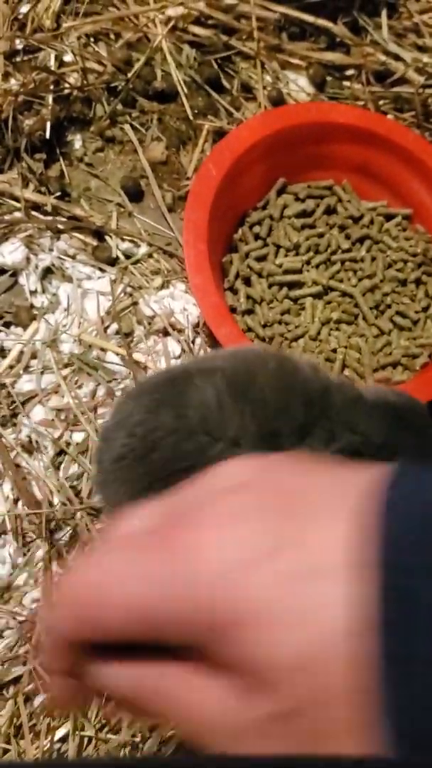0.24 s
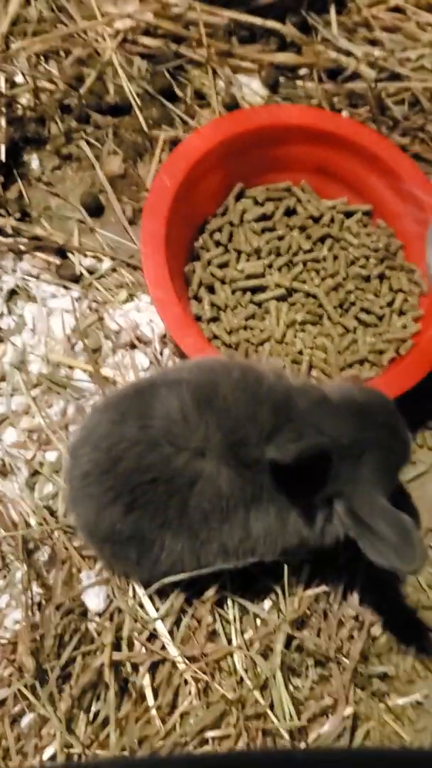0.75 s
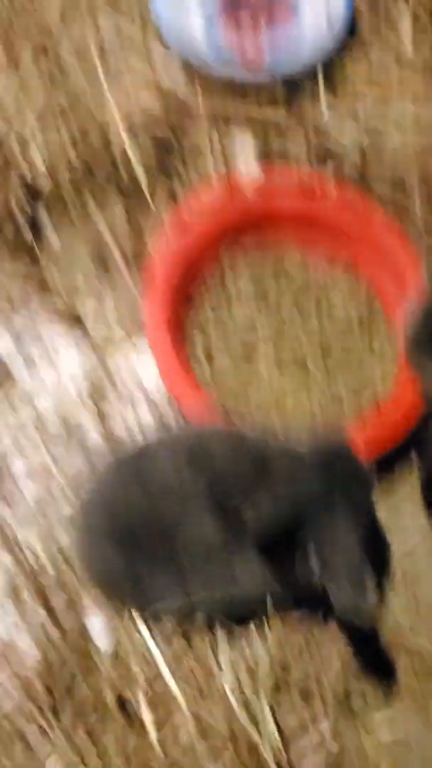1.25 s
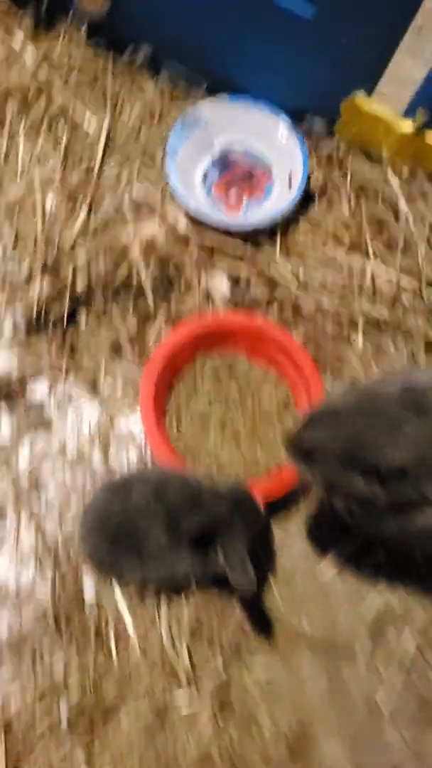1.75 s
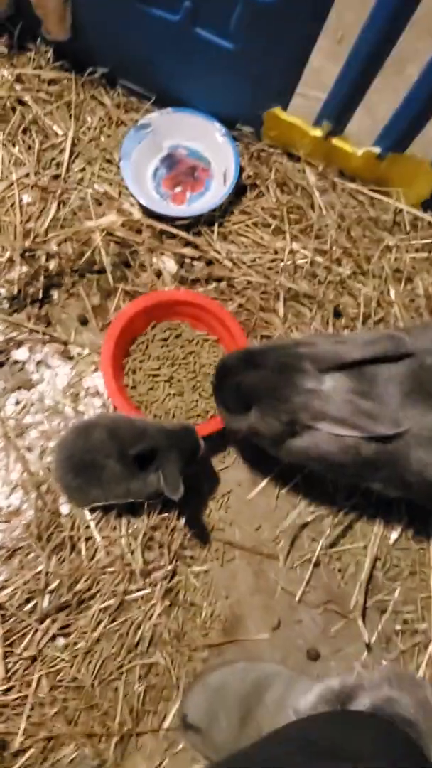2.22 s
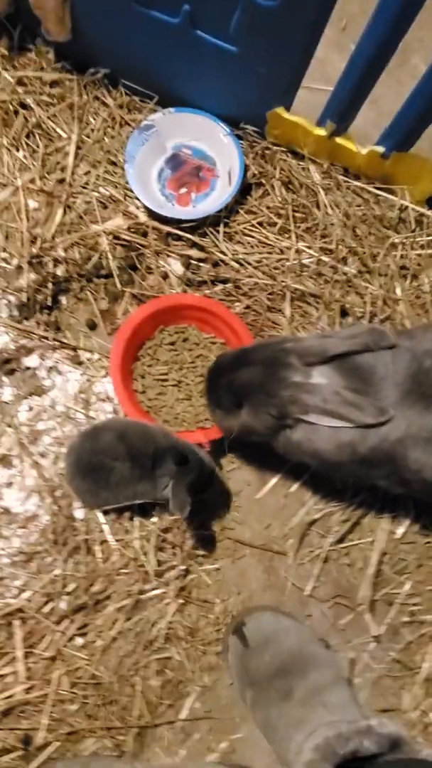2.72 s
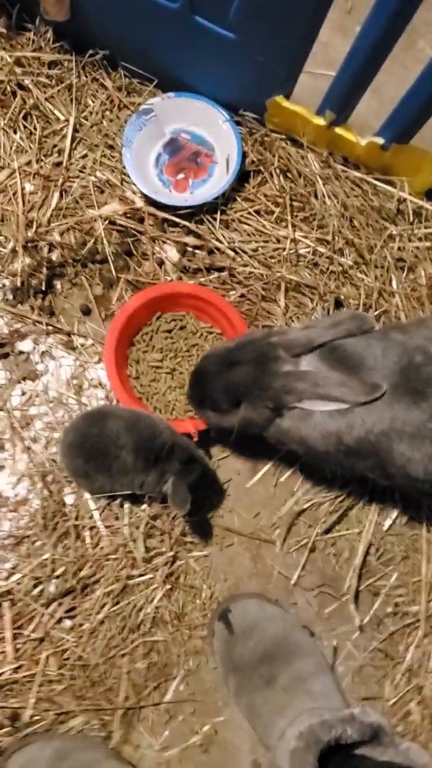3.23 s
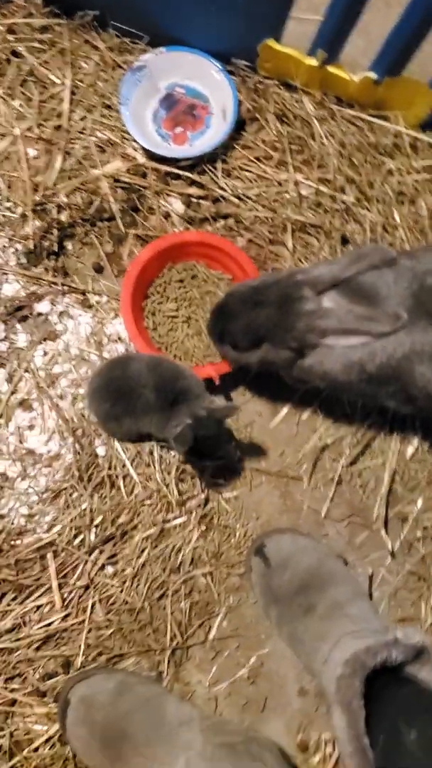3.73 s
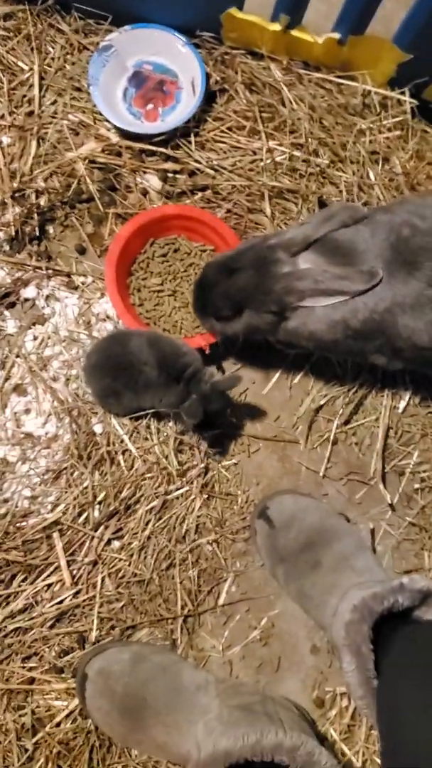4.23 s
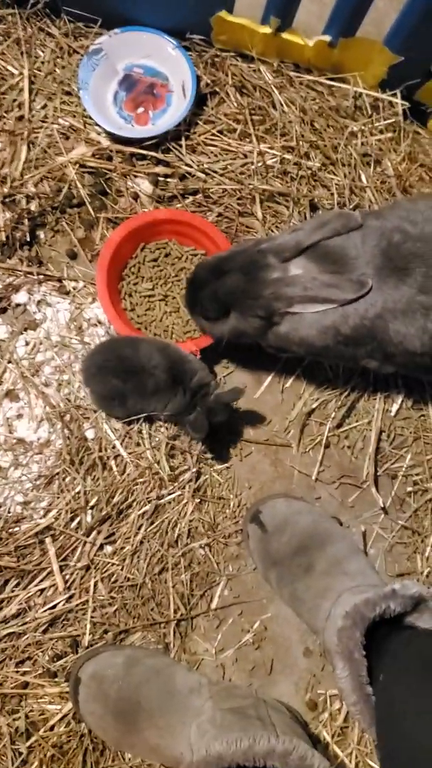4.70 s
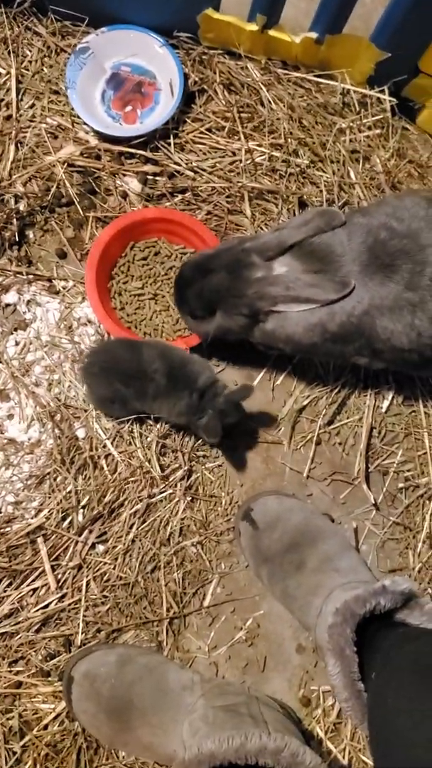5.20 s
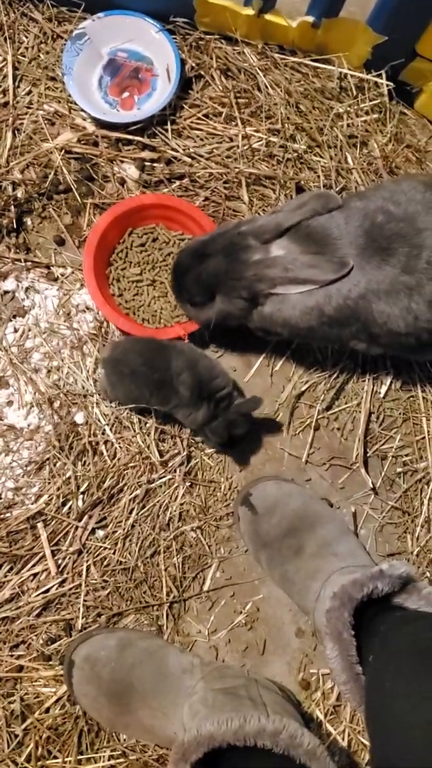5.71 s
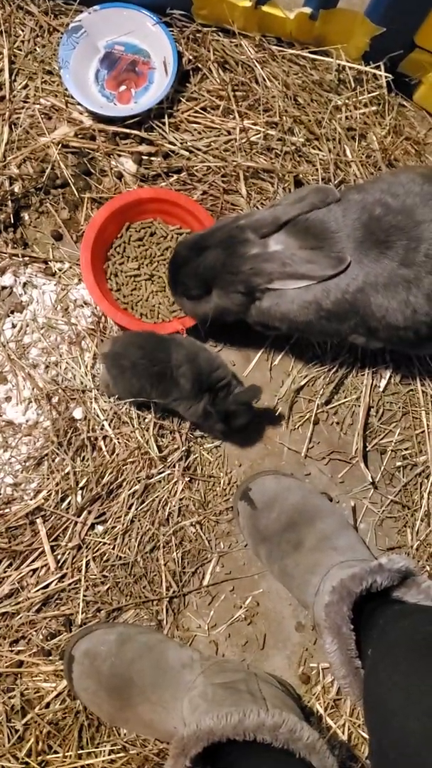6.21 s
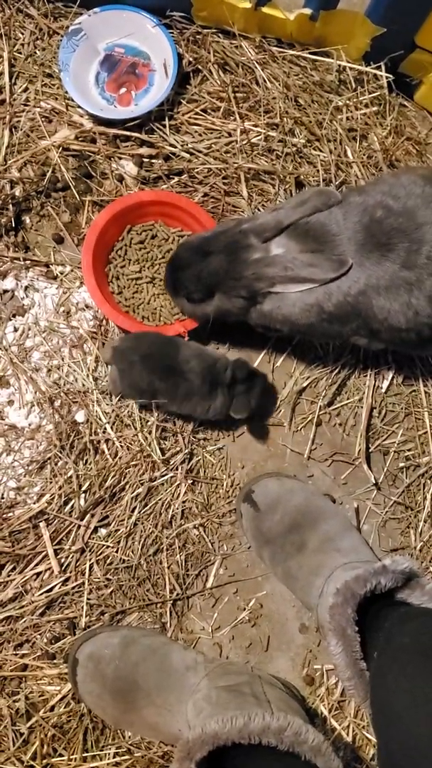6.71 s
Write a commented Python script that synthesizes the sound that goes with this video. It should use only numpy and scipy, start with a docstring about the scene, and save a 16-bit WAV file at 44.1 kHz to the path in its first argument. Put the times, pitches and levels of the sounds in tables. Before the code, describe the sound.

Straw rustles and crackles as rabbits shift about a pen, with tiny pellet ticks, soft thuds and one hollow plastic knock at the end.

```python
"""In a small shed, rabbits move about a straw-bedded plastic pen. Straw and cloth rustle in bursts,
stalks snap, pellets tick in the bowl, paws and slippers thud, and at the end a knock rings a panel.
Wire mesh sings faintly over still air, a rumble and a hum. Rustles are noise made of tiny slips; rings
are tones that die away. Short sounds echo in the shed. A hand-held phone hears it all through two
microphones, the left far brighter than the right."""
import sys
import numpy as np
from scipy import signal
from scipy.fft import rfft, irfft, next_fast_len
from scipy.io import wavfile
from scipy.ndimage import uniform_filter1d, map_coordinates

SR = 44100
rng = np.random.default_rng(int(sys.argv[2]) if len(sys.argv) > 2 else 0)


def wrap_up_sound(samples):
    """Save the sound to the file named by the first command line argument, as 16-bit audio."""
    columns = np.atleast_2d(samples).T
    # keep every value between -1 and 1, then stretch to whole-number steps
    tamed = np.clip(columns, -1, 1)
    steps = np.round(tamed * 32767).astype(np.int16)
    wavfile.write(sys.argv[1], SR, steps)


N = 306495

# A body moves in the straw: peak t/s, length/s, fine rustle/dB, coarse rustle/dB, scrape/dB, scuff/dB
MOVES = [(0.047, .08, -64, -96, -92, -65.5), (0.218, 0.31, -62, -76, -80, -61),
         (0.333, 0.23, -75, -67.5, -63.5, -69), (0.628, 0.47, -71, -65.5, -63, -54.5),
         (0.881, .09, -60, -61.5, -66, -66), (1.015, 0.12, -66.5, -76, -91, -78),
         (1.29, 0.32, -54.5, -68, -60, -59), (1.495, 0.11, -64, -83, -81, -63),
         (1.75, 0.59, -62.5, -70, -62, -59.5), (1.993, 0.21, -61.5, -74, -67, -69),
         (2.36, 0.38, -51, -62.5, -62, -84), (2.55, 0.33, -46.5, -60, -61, -68),
         (2.619, 0.081, -44, -52, -44.5, -48), (2.668, 0.16, -50, -59, -62, -64),
         (2.808, 0.026, -56, -68, -71, -80), (2.941, 0.15, -51.5, -66.5, -67.5, -66),
         (3.201, 0.11, -56.5, -65, -66.5, -86), (3.34, 0.23, -50.5, -61.5, -55.5, -59.5),
         (3.687, .3, -66, -81, -72.5, -64), (4.109, 0.14, -65, -88, -69.5, -61.5),
         (4.477, 0.15, -66, -74, -73, -59), (4.638, 0.28, -62.5, -64.5, -64.5, -72),
         (4.734, 0.07, -58, -62, -61, -70), (4.95, .07, -73, -70, -71, -79),
         (5.199, 0.11, -61.5, -69.5, -65.5, -75), (5.284, .1, -75, -65, -61, -73),
         (5.483, 0.21, -61.5, -69.5, -65.5, -60), (5.634, 0.19, -49.5, -72, -69, -82),
         (5.744, 0.25, -53.5, -58.5, -64, -82), (6.006, 0.1, -51, -62.5, -64, -58.5),
         (6.188, 0.016, -51, -66, -78, -80), (6.312, 0.042, -53.5, -69, -80, -80),
         (6.349, 0.031, -43, -63, -78, -78), (6.384, 0.079, -46, -62, -63.5, -81),
         (6.483, 0.042, -52, -73, -78, -64), (6.663, 0.087, -57.5, -58.5, -60, -84),
         (6.8, 0.1, -60, -60.5, -54, -66), (6.95, 0.051, -50, -80.5, -81, -70)]
# Fidgeting between the moves: t/s, straw level/dB, ground level/dB
FIDGETS = [(0, -73.5, -91), (.5, -79.5, -73), (1.1, -70.5, -71), (1.5, -62.5, -72), (2.1, -61.5, -61.5),
           (2.45, -59, -71), (2.8, -61.5, -66), (3.1, -65, -75), (3.6, -66, -75), (4.25, -72, -81),
           (4.6, -67.5, -68), (4.85, -79, -74), (5.35, -67, -63), (5.9, -70, -74), (6.15, -59.5, -64),
           (6.3, -70, -85), (6.6, -65, -71), (6.95, -70, -94)]
# Where the straw stirs: t/s, pan/dB (pan is how much louder the left is than the right)
STRAW_PAN = [(0, 14), (.6, 1), (.89, 4), (1.3, -12.5), (1.7, -2.3), (2.36, 0.5), (3.48, -2), (4.78, 5.5),
             (6.25, -4.5), (6.95, 7.5)]
# The colour (strength at each pitch) of fine and of coarse straw: f/Hz, level/dB
FINE_COLOUR = [(2940, -47.5), (5000, -15), (6860, -8.5), (7940, -15), (8880, -6), (9930, -10.5),
               (10800, -4.5), (12700, 0.5), (15000, -9), (15800, -10), (16100, -32.5)]
COARSE_COLOUR = [(900, -34), (1400, -5), (2000, -7.5), (3500, -3.5), (5500, -6), (8000, -24)]
def straw():
    """Fine and coarse rustle swell with every move and crackle on after every snap."""
    peak_s, length_s, fine_db, coarse_db = np.transpose(MOVES)[:4]
    snap_s, _, dull_db, _, crackle_db = np.transpose(SNAPS)
    rest_db = curves(FIDGETS)[0]
    settle_s = 0.14
    fine = swells(peak_s, length_s, fine_db) + tails(snap_s, crackle_db, settle_s) + amp(2 * rest_db)
    coarse = swells(peak_s, length_s, coarse_db) + tails(snap_s, crackle_db + dull_db, settle_s)
    coarse += amp(2 * (rest_db - 10))  # doubling the dB gives power; the square root gives gain again
    bright = np.sqrt(fine) * rustle(FINE_COLOUR, spiky_db=2.5, lumpy_db=0.9)
    dull = np.sqrt(coarse) * rustle(COARSE_COLOUR, spiky_db=2.5, lumpy_db=0.6)
    return bright * sides(curves(STRAW_PAN)[0]) + dull


# Breaking stalks: t/s, level/dB, dull part against bright part/dB, pan/dB, crackle afterwards/dB
SNAPS = [(0.2027, -40, -24, 14, -60), (.851, -33, -10, 1, -44.5), (.966, -47, -22, -6, -65),
         (1.2998, -27, -4.5, -22, -75), (1.575, -34.5, -17, -8, -63), (1.612, -43, -18, 1.5, -61),
         (1.699, -39, -23, 4.5, -64), (1.774, -35, -14, -3, -50), (1.8206, -37, -12, 0, -55),
         (1.942, -36.5, -8, -14, -64), (2.1795, -25.5, -5.5, -2.5, -49), (2.311, -36, -16, 13, -45.5),
         (2.3535, -33, -18, 11, -44), (2.3984, -29, -16, 1, -48), (2.4612, -28, -17, 0, -44.5),
         (2.634, -23, -20, 1, -41), (2.8098, -39, -13, 3.5, -65), (2.8637, -35.5, -8.5, 4, -60),
         (2.903, -31.5, -20, -1, -68), (2.936, -46, -14, 28, -53), (2.9931, -39, -11, 2, -67),
         (3.131, -41, -8, 2, -72), (4.249, -49, -31, 4, -77), (4.2877, -51, -30, 9.5, -66),
         (4.3196, -48, -28, 3.5, -72), (4.492, -46.5, 13, 25, -78), (4.6124, -29.5, -9, -1, -57),
         (4.905, -55, 4, 10.5, -86), (4.9455, -51.5, 2, 10.5, -72), (5.2014, -38, 4, 3, -67),
         (5.3133, -46.5, -13, 14, -81), (5.4294, -47, 0, 11, -68), (5.7046, -37, -24, 5, -58),
         (5.7751, -29, -8.5, -1, -64), (5.8217, -28.5, -8.5, 0, -52), (5.9156, -42, -27, .6, -52),
         (5.932, -36, -32, 2, -68), (5.986, -39, -28, 8, -48), (6.165, -61, -28, -1, -73),
         (6.19, -40, -16, 10, -69), (6.225, -52, -24, 5, -70), (6.2622, -42, -22, -1.5, -64),
         (6.303, -41, -18, 8.5, -58), (6.341, -36, -41, 6, -58), (6.48, -41, -31, -1.5, -64),
         (6.9353, -40, -32, -1, -56)]
def snaps():
    """A stalk breaks: a few milliseconds of splinters, bright with a dull part, then the echo."""
    out, t = np.zeros((2, N)), np.arange(600) / SR
    bright, dull = impulse(FINE_COLOUR), impulse(COARSE_COLOUR)
    for s, db, dull_db, pan_db, _ in SNAPS:
        splinters = fade(t, fade_s=0.0059) * rng.standard_normal(len(t))
        crack = np.convolve(splinters, bright + amp(dull_db) * dull)
        crack /= np.abs(crack).max()
        add(out, s, amp(db) * sides(pan_db)[:, None] * in_shed(crack, wet_db=-3), lag=-9)
    return out


# Knocks on the pen: t/s, level/dB
KNOCKS = [(6.772, -13), (6.785, -22)]
# The panel's own tones: f/Hz, level/dB, fade/s (a fade is the time taken to drop by 60 dB)
PANEL_TONES = [(193.5, -6, 0.22), (250, -13, 0.18), (336.3, 3, 0.25), (413.3, 3, 0.24), (470, -19, 0.21),
               (540, -12, 0.29), (554, -7.5, 0.31), (585, -3.5, 0.26), (710, -22, 0.24), (865, -9, 0.13),
               (1013, -14, 0.13), (1275, -27, 0.19), (1375, -24, 0.19), (1451, -9, 0.2), (1456, -28, .22),
               (1900, -34, 0.25), (2692, -29.5, 0.2)]
# The knock's dull noise: f/Hz, level/dB
KNOCK_COLOUR = [(35, -60), (60, -29), (202, -12.5), (266, -19), (342, -3), (554, -4.5), (1080, -28),
                (1390, -19), (1680, -32.5), (9000, -57), (11700, -95), (19800, -120)]
def panel():
    """A blunt knock and its rebound ring the hollow panel, nearer the left microphone."""
    out, t = np.zeros((2, N)), np.arange(SR // 4) / SR
    ring = ringing(t, PANEL_TONES) * onset(t, rise_s=0.001)
    for s, db in KNOCKS:
        add(out, s, amp(db - 6.5) * np.array([ring, ring]), lag=10.3)
        add(out, s, amp(db + 10.5) * in_shed(impulse(KNOCK_COLOUR), wet_db=8.5), lag=13)
    return out * sides(pan_db=2.5)[:, None]


# Soft blows of paws and slippers: t/s, level/dB, f/Hz, fade/s, scuff afterwards/dB
THUDS = [(0.139, -46, 104, .086, -64), (.312, -44.5, 96.5, 0.092, -55), (.353, -60, 96, 0.083, -49),
         (.855, -38.5, 365, 0.031, -56.5), (1.224, -43, 138.6, 0.22, -55), (1.641, -39.5, 316, 0.1, -44.5),
         (1.825, -37.5, 97, 0.092, -50), (2.175, -50.5, 205, 0.2, -51.5), (2.606, -42, 194, 0.087, -65),
         (3.255, -38, 317, .06, -42.5), (3.345, -46.5, 470, 0.074, -71), (4.529, -44, 186, 0.062, -65),
         (4.652, -37, 188, 0.097, -61), (5.074, -63, 328, 0.055, -53.5), (5.272, -40, 420, 0.083, -47.5),
         (5.498, -51, 293, 0.047, -65), (5.634, -51.5, 699, 0.099, -58), (5.972, -51, 604, 0.11, -59)]
def thuds():
    """A soft blow pushes the ground, which rings briefly with three tones."""
    out, t = np.zeros((2, N)), np.arange(6000) / SR
    for s, db, hz, fade_s, _ in THUDS:
        tone = sine(hz, t) + 0.28 * sine(1.615 * hz, t) + 0.24 * sine(0.6 * hz, t)
        push = amp(db) * tone * fade(t, fade_s) * onset(t, rise_s=0.0018)
        add(out, s, in_shed(push, wet_db=-6), lag=4.4)
    return out


# Pellets and twigs: t/s, level/dB, f/Hz, crack against pop/dB, pan/dB
TICKS = [(1.851, -42, 820, -3, 24), (2.178, -47.5, 1500, -1, -2), (2.461, -48, 980, -12, 6),
         (2.586, -45, 1290, -12, -4), (2.605, -41, 795, -12, 2), (2.621, -30, 890, -2, 6),
         (2.635, -33.5, 1340, 7, -4), (2.846, -48, 1050, -5, -3), (3.131, -53, 1280, -15, 6),
         (3.352, -36.5, 1140, -14, -1), (3.365, -52, 1090, -12, 3.0), (3.405, -34, 1220, -22, 0),
         (3.211, -51.5, 1100, -14, -2), (3.668, -55, 1300, -14, 0), (3.729, -55.5, 1510, -10, 0),
         (3.413, -53, 1050, -8, -4)]
def ticks():
    """A pellet drops or a twig breaks: a tiny pitched pop under a dry crack."""
    out, t = np.zeros((2, N)), np.arange(2048) / SR
    crack = impulse(COARSE_COLOUR)
    for s, db, hz, crack_db, pan_db in TICKS:
        pop = sine(hz, t) * fade(t, fade_s=0.0086) * onset(t, rise_s=0.00029)
        tick = pop / pop.max() + amp(crack_db) * crack / np.abs(crack).max()
        add(out, s, amp(db) * sides(pan_db)[:, None] * in_shed(tick, wet_db=-9.5), lag=4.7)
    return out


# A low scuff and a higher scrape on the ground: f/Hz, level/dB
SCUFF_COLOUR = [(70, 5), (130, -2.5), (250, 1), (420, 0), (600, -5), (900, -29)]
SCRAPE_COLOUR = [(450, -6), (750, -3), (1300, -6), (2100, -7.5), (3000, -19)]
def shuffling():
    """Fur, paws and slippers rub the ground with every move and scuff on after every thud."""
    peak_s, length_s, _, _, scrape_db, scuff_db = np.transpose(MOVES)
    thud_s, *_, after_db = np.transpose(THUDS)
    rest_db = curves(FIDGETS)[1]
    scuff = swells(peak_s, length_s, scuff_db) + amp(2 * rest_db)
    scuff += tails(thud_s, after_db, fade_s=0.27, attack_s=0.0046)
    scrape = swells(peak_s, length_s, scrape_db) + amp(2 * (rest_db - 12))
    low = np.sqrt(scuff) * rustle(SCUFF_COLOUR, spiky_db=1.5, lumpy_db=-0.8)
    return low + np.sqrt(scrape) * rustle(SCRAPE_COLOUR, spiky_db=1.3, lumpy_db=1.36)


# How loud the hollow ring is: t/s, level/dB
HOLLOW_LEVEL = [(0, -79), (.4, -64.5), (.65, -65), (.8, -65.5), (1.05, -64.5), (1.5, -80), (1.9, -64.5),
                (2.3, -71.5), (4.2, -80), (4.9, -76), (5.1, -66), (5.4, -72.5), (6.0, -82), (6.7, -80.5)]
# Its narrow band of pitches: f/Hz, level/dB
HOLLOW_COLOUR = [(300, -30), (400, 4.5), (430, 1.5), (455, 0.5), (490, -18), (620, -45)]
def hollow_ring():
    """A hollow ring comes and goes under the shuffling."""
    return amp(curves(HOLLOW_LEVEL)[0]) * rustle(HOLLOW_COLOUR, spiky_db=1.5, lumpy_db=2.0)


# Shakes of the mesh: peak t/s, length/s, level/dB
SHAKES = [(4.695, 0.24, -54), (4.983, 0.15, -60.5), (5.079, 0.089, -58), (5.312, 0.25, -62)]
# The wires' own tones: f/Hz, level/dB
WIRE_TONES = [(605, 2.5), (671, 4.5), (830, 1.5), (931, -4), (1010, -4), (1303, -0.5), (1357, -7),
              (1612, -28), (2305, -12), (2545, -6), (2985, -13), (3195, -8)]
def wire_mesh(width_hz=30):
    """Shaken wires sing: noise passes only in narrow bands around their tones."""
    def bands(f):
        damping = 1j * f * width_hz
        return sum(amp(db) * damping / (hz * hz - f * f + damping) for hz, db in WIRE_TONES)
    singing = paired(rng.standard_normal((2, N)), bands) * amp(4.2 * wobble(18))
    return np.sqrt(swells(*np.transpose(SHAKES))) * unit(singing)


# The tones of a piece of metal: f/Hz, level/dB, fade/s
CLINK_TONES = [(1096, -79, 0.31), (1567, -78.5, 0.79), (1740, -78.5, 0.36), (2550, -85, .2),
               (2820, -74, .2)]
def clink():
    """Metal clinks once, so far off that there is more echo than direct sound."""
    out, t = np.zeros((2, N)), np.arange(SR // 2) / SR
    flicker = amp(2.4 * wobble(64)[:len(t)])
    ring = ringing(t, CLINK_TONES) * onset(t, rise_s=0.0044) * flicker
    add(out, s=1.012, sound=in_shed(ring, wet_db=7), lag=15)
    return out


def whistle(start_s=0.6, length_s=0.23, top_hz=14150, fall_hz=2400):
    """A faint thin tone holds, then slides down ever faster and fades."""
    progress = np.clip((np.arange(N) / SR - start_s) / length_s, 0, 1)
    arch = np.sqrt(np.sin(np.pi * progress).clip(0))
    return amp(-73 + 1.8 * wobble(40)) * arch * glide(top_hz - fall_hz * progress ** 2.7)


# How loud the rumble is: t/s, level/dB
RUMBLE_LEVEL = [(0, -55.5), (.08, -64), (.35, -50), (.52, -61), (.95, -64.5), (1.33, -50.5), (1.55, -58),
                (1.8, -54.5), (2.1, -75), (2.24, -50.5), (2.34, -73), (2.59, -57), (3.15, -71), (3.3, -63),
                (3.83, -62), (4.24, -69), (4.68, -50.5), (4.9, -78), (5.53, -55.5), (5.71, -82),
                (5.98, -62.5), (6.64, -69), (6.77, -53), (6.95, -60)]
# Its deep colour: f/Hz, level/dB
RUMBLE_COLOUR = [(15, -37), (25, -8), (39, -10), (59, 1), (111, -7), (135, -15), (160, -16), (210, -45),
                 (350, -120)]
def rumble():
    """Deep noise rises and falls unsteadily."""
    return amp(curves(RUMBLE_LEVEL)[0]) * rustle(RUMBLE_COLOUR, spiky_db=-0.1, lumpy_db=-0.45)


def hum(hz=60.3):
    """A low hum wavers in loudness and pitch."""
    return amp(-68.5 + 3.1 * wobble(4.08)) * glide(hz + 4 * wobble(3.3))


# The still shed: f/Hz, level/dB
AIR_COLOUR = [(59, -4), (100, -20), (185, -1.5), (295, 3.5), (406, -4), (558, -2.5), (1550, -5),
              (2690, -43), (6700, -10.5), (7610, -46), (12700, -22), (14400, -26), (16000, -20)]
def air():
    """Still air makes a faint, even hush."""
    return amp(-73) * rustle(AIR_COLOUR, spiky_db=0.1, lumpy_db=0.8)


# How long the shed echoes: f/Hz, fade/s
ECHO_FADES = [(200, 0.21), (2000, 0.3), (6000, 0.097), (14000, 0.059)]
def in_shed(sound, wet_db):
    """A short mono sound plus a stereo echo at wet_db, in which each pitch dies at its own speed."""
    hz, t, noise = signal.stft(rng.standard_normal((2, int(0.2 * SR))), SR, nperseg=256)
    tail = signal.istft(noise * fade(t, along(ECHO_FADES, hz)[:, None]), SR, nperseg=256)[1]
    tail = paired(tail, np.ones_like)
    tail = np.pad(tail / np.linalg.norm(tail[0]), [(0, 0), (60, 0)])  # arrives 60 samples late
    echo = signal.fftconvolve(sound[None], tail, axes=1)
    return amp(wet_db) * echo + np.pad(sound, (0, echo.shape[1] - len(sound)))


# How alike left and right sound: f/Hz, likeness (1 the same, 0 unrelated)
LIKENESS = [(60, 1), (130, 0.7), (290, 0.9), (640, 0.4), (1410, -0.26), (3100, 0.12), (6820, 0.08),
            (15000, -0.11)]
def paired(x, colour):
    """Colour two unrelated signals and mix them to the likeness that the microphones hear."""
    size = next_fast_len(x.shape[1] + 4096)
    hz = np.fft.rfftfreq(size, 1 / SR)
    turn = np.arccos(np.clip(along(LIKENESS, hz), -1, 1)) / 2
    spectrum = rfft(x, size) * colour(hz) * [np.cos(turn), np.sin(turn)]
    mid, side = irfft(spectrum, size)[:, :x.shape[1]]
    return np.array([mid + side, mid - side])


def rustle(colour, spiky_db, lumpy_db):
    """Stereo crackle of standard strength: countless tiny slips of uneven size, coming in lumps."""
    size = amp(spiky_db * rng.exponential(size=N) + lumpy_db * (wobble(35) + wobble(160)))
    slips = size * patchy(rng.standard_normal((2, N)), depth_db=2.5)
    pair = paired(slips, lambda hz: amp(along(colour, hz)))
    return pair / np.std(pair.mean(axis=0))


def patchy(x, depth_db):
    """Random pitches stand out or sink for a moment, as when small things ring and echoes overlap."""
    spectra = signal.stft(x, nperseg=1024)[2]
    patches = uniform_filter1d(rng.standard_normal(spectra.shape[1:]), 2, axis=0)
    patches = uniform_filter1d(patches, 5, axis=1)
    return signal.istft(spectra * amp(depth_db * unit(patches)), nperseg=1024)[1][:, :N]


def impulse(colour, size=2048):
    """A click of energy 1 with the given colour."""
    gain = amp(along(colour, np.fft.rfftfreq(size, 1 / SR)))
    cepstrum = irfft(np.log(gain + 1e-6))
    cepstrum[1:size // 2] *= 2  # folding the late half forward packs the energy at the start
    cepstrum[size // 2 + 1:] = 0
    click = irfft(np.exp(rfft(cepstrum)))
    return click / np.linalg.norm(click)


def swells(peak_s, length_s, level_db, rise_share=0.41, edge_db=12.5, roundness=1.35):
    """Power of events that rise to a peak and sink again; their ends lie edge_db under the peak."""
    def shape_db(t):
        phase = (t - peak_s[:, None]) / length_s[:, None]
        return -edge_db * np.maximum(-phase / rise_share, phase / (1 - rise_share)) ** roundness
    return power(shape_db, level_db)


def tails(start_s, level_db, fade_s, attack_s=0.002):
    """Power of events that start at once and die away."""
    age = lambda t: t - start_s[:, None] - attack_s
    return power(lambda t: np.minimum(20 * age(t) / attack_s, -60 * age(t) / fade_s), level_db)


def power(shape_db, level_db):
    """Summed power of events; shape_db gives each one's course over time."""
    t = np.arange(0, N / SR + .001, .001)
    return np.interp(np.arange(N) / SR, t, amp(2 * level_db) @ amp(2 * shape_db(t).clip(-90)))


def ringing(t, tones):
    """A struck object's tones, each dying at its own speed."""
    return sum(amp(db) * fade(t, fade_s) * sine(hz, t) for hz, db, fade_s in tones)


def sine(hz, t):
    """A pure, steady tone."""
    return np.sin(2 * np.pi * hz * t)


def glide(hz):
    """A pure tone that follows a changing pitch."""
    return np.sin(2 * np.pi * np.cumsum(hz) / SR)


def fade(t, fade_s):
    """A gain that drops 60 dB in fade_s."""
    return amp(-60 * t / fade_s)


def onset(t, rise_s):
    """A gain that climbs from 0 towards 1."""
    return 1 - np.exp(-t / rise_s)


def wobble(rate):
    """A smooth random curve through rate points a second."""
    steps = np.arange(0, N + 16, 16)
    knots = rng.standard_normal(int(N * rate / SR) + 4)
    return np.interp(np.arange(N), steps, map_coordinates(knots, [steps * rate / SR]))


def amp(db):
    """Decibels to gain."""
    return 10 ** (np.asarray(db) / 20)


def unit(x):
    """Scale to an average power of 1."""
    return x / np.sqrt(np.mean(x ** 2) + 1e-20)


def along(points, hz):
    """Read between (f/Hz, value) points on a log scale of pitch."""
    f, values = np.transpose(points)
    return np.interp(np.log(hz + 1), np.log(f + 1), values)


def curves(rows):
    """One value per sample for each column after the time."""
    s, *columns = np.transpose(rows)
    return [np.interp(np.arange(N) / SR, s, column) for column in columns]


def sides(pan_db):
    """Left and right gains that keep the total power."""
    share = 1 / (1 + amp(-2 * np.asarray(pan_db)))
    return np.sqrt(2 * np.array([share, 1 - share]))


def add(track, s, sound, lag=0):
    """Lay a stereo sound on the track at s seconds; the right is lag samples late (early if below 0)."""
    for side, start in enumerate([round(s * SR), round(s * SR + lag)]):
        part = track[side, start:start + sound.shape[1]]
        part += sound[side, :len(part)]


def scene():
    """Everything in and around the pen."""
    rubbing = straw() + hollow_ring() + shuffling()
    hits = snaps() + ticks() + thuds() + panel()
    return rubbing + hits + wire_mesh() + clink() + whistle() + rumble() + hum() + air()


# Which microphone hears each pitch louder: f/Hz, pan/dB
MIC_BALANCE = [(60, 1.5), (110, -2), (200, -1), (380, -3.5), (700, -3.5), (1290, 2.5), (2380, 4.5),
               (4400, 20), (8120, 3.5), (15000, 15)]
def record(dry, bass_hz=35, top_hz=16100):
    """Each microphone colours the sound its own way; both lose the deepest bass and the very top."""
    size = next_fast_len(N + SR // 2)
    hz = np.fft.rfftfreq(size, 1 / SR)
    bass_cut = (1j * hz / (bass_hz + 1j * hz)) ** 3
    response = sides(along(MIC_BALANCE, hz)) * bass_cut * (hz < top_hz)
    return irfft(rfft(dry, size) * response, size)[:, :N]


dry = scene()
out = record(dry)
wrap_up_sound(out)
```